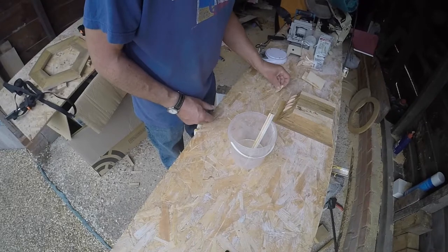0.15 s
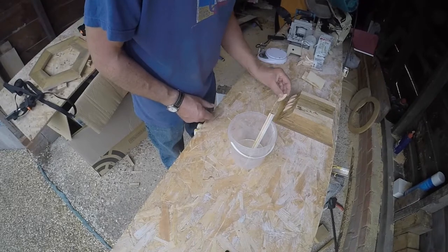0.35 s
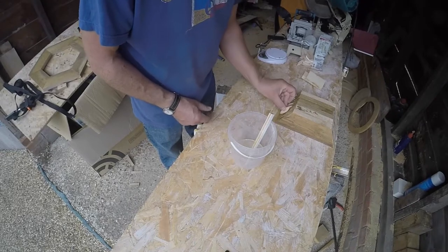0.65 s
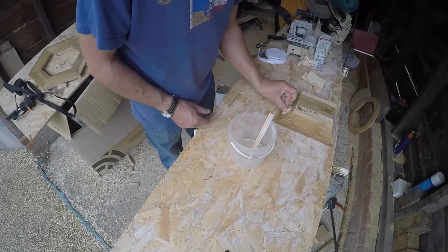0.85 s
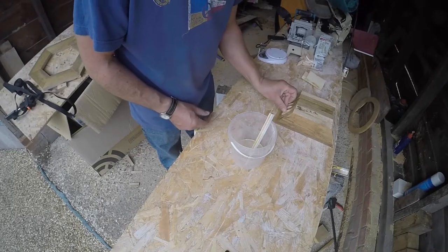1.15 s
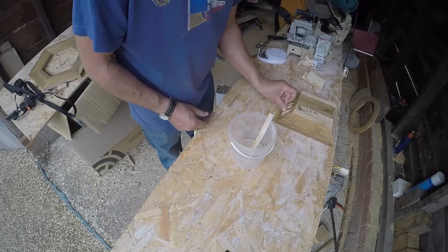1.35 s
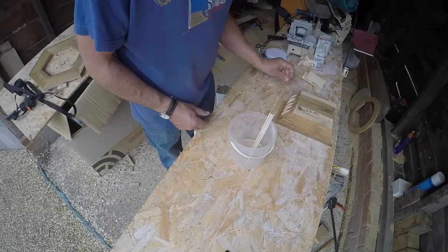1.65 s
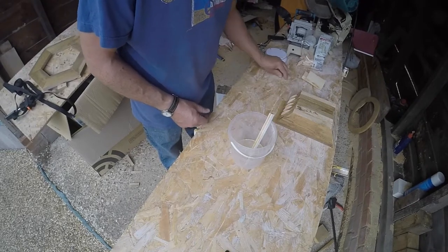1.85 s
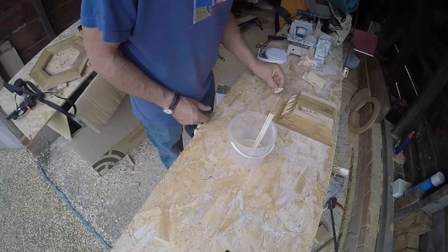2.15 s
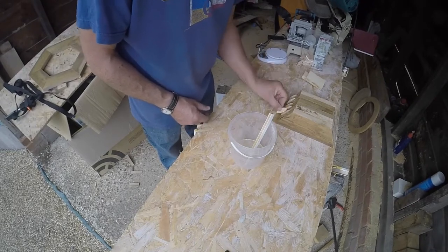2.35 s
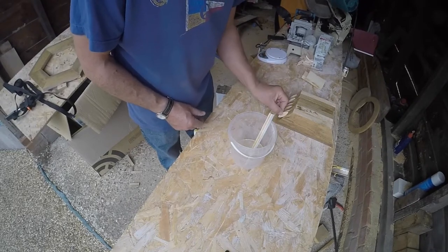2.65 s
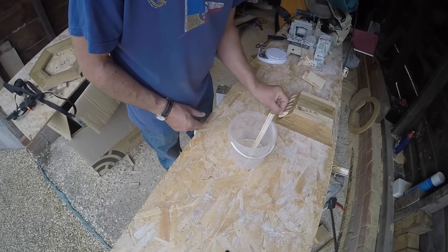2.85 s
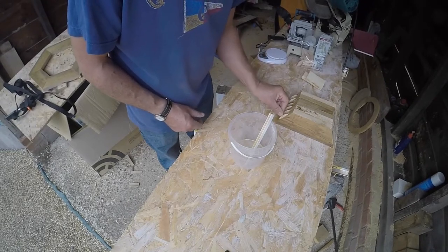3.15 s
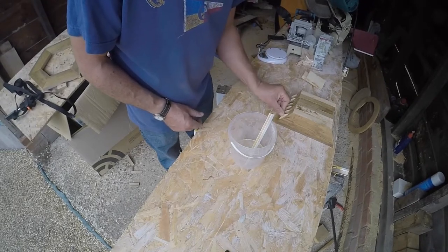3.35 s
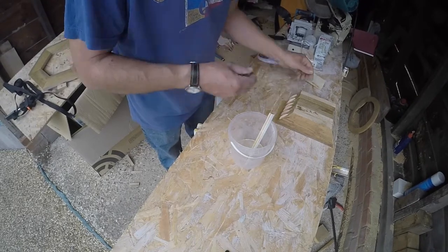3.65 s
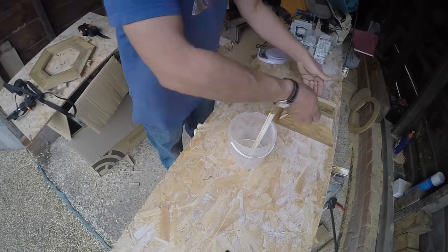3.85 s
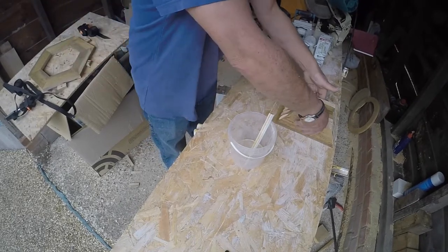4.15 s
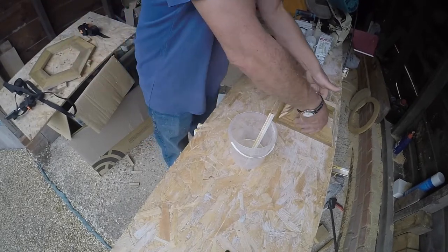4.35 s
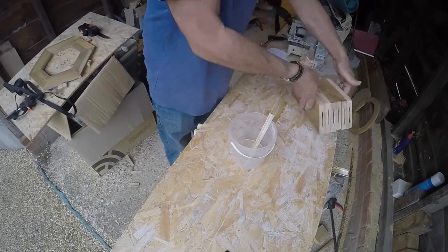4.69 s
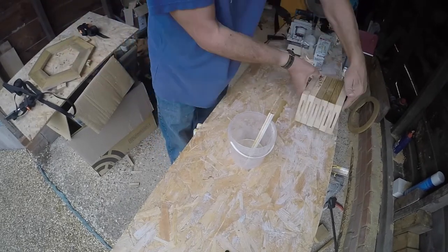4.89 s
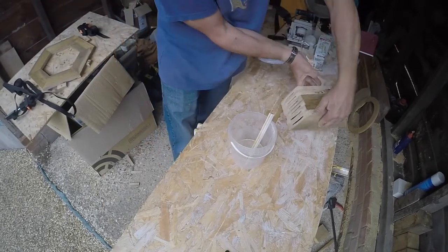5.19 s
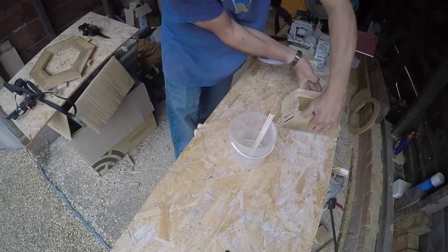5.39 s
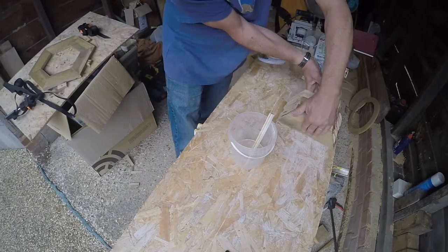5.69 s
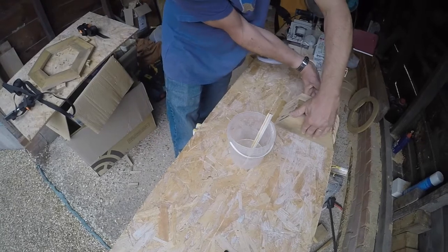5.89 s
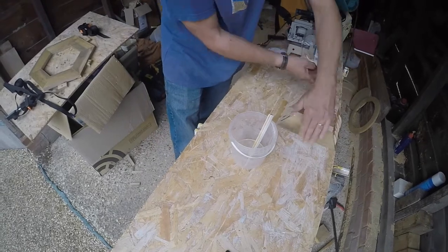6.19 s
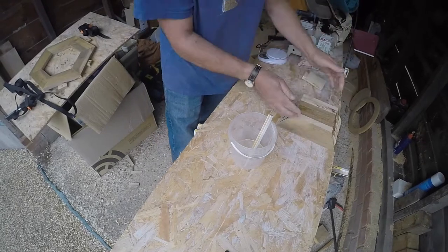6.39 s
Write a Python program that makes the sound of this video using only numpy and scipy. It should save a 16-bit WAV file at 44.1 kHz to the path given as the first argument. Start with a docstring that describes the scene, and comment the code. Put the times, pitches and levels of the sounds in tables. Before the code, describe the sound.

Throughout, a deep rumble swells and lumps unevenly beneath a quiet, steady hiss with thin, barely audible whines. At the very start there is a small wooden knock, with fainter ones around 0.2 s. Near 1.9 s a light block is pushed with a tiny dry scrape and set down with a soft click. A barely audible touch comes at 3.4 s. From 4.2 to 4.4 s a hollow slatted box gives several muted knocks and light rubs as it is picked up. At 5.54 s its edge strikes the bench with a hard clack, then scuffs; at 5.84 s it falls flat, an abrupt bright crack and heavy woody thud that overloads the nearby microphone. Loose slats rattle away until about 6.05 s, with a short dull shed tail. A soft, hollow hand pat follows at 6.18 s, then a faint rubbing slide around 6.4 s before the rumble ends at about 6.5 s.

```python
"""Wood knocks, slides, then drops flat with an overloading crack and rattle, over rumble and hiss.
A slatted wooden box is picked up, turned and set down on a chipboard workbench in a shed, and a hand pats it;
a small block is nudged before that. Blows and slips drive damped modes of the wood; short noise bursts make
clacks and thuds, shaped noise makes the rubs, the lumpy rumble and the hiss, and the shed adds a dull tail."""
import sys
import numpy as np
from scipy import signal
from scipy.fft import rfft, irfft, next_fast_len
from scipy.io import wavfile
from scipy.ndimage import uniform_filter1d

SR = 44100
rng = np.random.default_rng(int(sys.argv[2]) if len(sys.argv) > 2 else 0)


def put_to_file(sound):
    """Save the sound as 16-bit audio at rate SR, in the file named by the first command-line argument."""
    columns = np.atleast_2d(sound).T  # one column per channel
    safe = np.clip(columns, -1, 1)
    whole_steps = np.round(safe * 32767)
    wavfile.write(sys.argv[1], SR, whole_steps.astype(np.int16))


N = 287973


def box(clack_db=2.0, clack_growth=0.35, spread_db=3.5, detune=0.0061, held_ring_db=2.5, flat_ring_db=-3):
    """Knocks ring box and bench, make the bench thud and the slats clack; lying flat damps the slats."""
    # knocks of box on bench: t/s, box level/dB, bench level/dB, contact brightness f/Hz
    knocks = [(0.002, -28, -45, 2600), (0.153, -33, -44, 650), (0.204, -37, -43, 1300),
              (3.423, -39.5, -51, 1400), (4.175, -25.5, -42, 500), (4.1895, -20.5, -27, 596),
              (4.364, -32.5, -35, 1100), (4.404, -25, -32, 450), (5.536, -3, -18, 2590),
              (5.54, -9.5, -26, 3500), (5.544, -26, -4, 3300), (5.579, -13.5, -17, 950),
              (5.8129, -18.5, -17.5, 2200), (5.819, -17, -10.5, 2330), (5.8385, -10, -0.5, 490),
              (5.8422, 7, 5, 1880), (5.8485, -13, -8, 4370), (5.8595, -2.5, -6.5, 600),
              (5.886, -24, -26, 4000), (5.8972, -23, -13.5, 900), (5.9071, -12, -9, 2200),
              (5.9548, -22.5, -21.5, 3000), (5.9835, -24.5, -36, 2830), (6.002, -31, -26, 2020),
              (6.016, -22.5, -20.5, 1670)]
    # box dragged over the bench: middle t/s, length/s, level/dB, brightness f/Hz
    slides = [(0.205, 0.034, -44, 1000), (3.428, 0.04, -47.5, 1100), (4.19, 0.039, -49, 700),
              (4.267, 0.05, -42.5, 2180), (5.638, 0.038, -29.5, 1000), (5.715, 0.068, -33, 330),
              (5.895, 0.036, -39, 2600), (6.005, 0.083, -41.5, 1800), (6.42, .2, -61, 2540)]
    # ringing modes of the box, lowest first: f/Hz, level/dB, decay t60/s
    box_modes = [(506, -3, 0.11), (570, -11.5, 0.14), (648.5, -14, 0.098), (742, -16, 0.12),
                 (832, -14.5, 0.07), (871, -17, 0.09), (969, -23.5, 0.12), (992, -17, 0.074),
                 (1126, -23.5, 0.16), (1250, -24, 0.099), (1420, -20, .07), (1463, -18, 0.049),
                 (1540, -15, 0.035), (1640, -24, 0.11), (1746, -20, 0.03), (2052, -17.5, 0.055),
                 (2145, -20, 0.045), (2330, -16.5, 0.045), (2465, -20.5, 0.03), (2665, -14.5, 0.032),
                 (2780, -17.5, 0.03), (2960, -20.5, 0.058), (3120, -13, 0.031), (3550, -35, 0.037),
                 (4350, -24, 0.037), (4900, -25, 0.025), (5850, -28.5, 0.027)]
    # ringing modes of the bench top: f/Hz, level/dB, decay t60/s
    bench_modes = [(69.4, -13, 0.98), (94, -17, 0.33), (136.7, -7.5, 0.33), (153.4, -18, 0.65),
                   (245, -20, 0.056), (285.8, -17, 0.15), (376, -21, 0.071), (449.5, -5, 0.26),
                   (604, -6, 0.065), (667, -13.5, 0.21), (748, -21, 0.085)]
    # lying flat, the box couples to the bench and its lowest mode splits in three: f/Hz, level/dB, decay t60/s
    flat_modes = [(445, -16, 0.2), (523, -1, 0.12), (588.5, -5.5, 0.26)]
    lies_flat_s = 5.83

    on_slats, on_bench, held, flat = np.zeros((4, N))
    blows = []
    for s, box_db, bench_db, hz in knocks:
        force = contact(hz)
        add(held if s < lies_flat_s else flat, s, from_db(box_db) * force)
        add(on_bench, s, from_db(bench_db) * force)
        blows.append((s, box_db, hz))
    blows += chatter()

    slat_blows = []
    for s, db, hz in blows:
        # the clack grows faster than the blow, up to 0 dB
        growth_db = clack_growth * min(db, 0)
        add(on_slats, s, from_db(db + clack_db + growth_db) * clack(contact(hz)))
        ring_db = held_ring_db if s < lies_flat_s else flat_ring_db
        slat_blows.append((s, db + ring_db, hz))
    slats = struck(slat_blows, box_modes[1:], spread_db, detune)

    panel = ring(held, box_modes[:1])
    for mode in flat_modes:
        panel = panel + rocking(ring(flat, [mode]))
    # broad boards are slow to get moving
    boards = lowpass(panel + ring(on_bench, bench_modes), hz=1500)
    return boards + slats + on_slats + bench_thud(on_bench) + slap() + drags(slides, box_modes)


def chatter(count=16):
    """While the box settles, its loose slats tick at uneven moments, on the whole ever more weakly."""
    start_s, length_s, brightness_hz = 5.866, 0.17, 2240
    start_db, loss_db_per_s, spread_db = -30, 71.5, 9
    late = rng.random(count)
    size = rng.uniform(-1, 1, count)
    after = (np.arange(count) + late) / count * length_s
    levels = start_db - loss_db_per_s * after + spread_db * size
    return [(start_s + t, db, brightness_hz) for t, db in zip(after, levels)]


def struck(rows, modes, spread_db, detune):
    """Each blow meets another spot and grip, so it weights and tunes the modes its own way."""
    out = np.zeros(N)
    for s, db, hz in rows:
        weights, shifts = rng.standard_normal((2, len(modes)))
        own = []
        for (f, level, t60), weight, shift in zip(modes, weights, shifts):
            own.append((f * (1 + detune * shift), level + spread_db * weight, t60))
        force = from_db(db) * np.pad(contact(hz), (0, SR // 4))
        # neighbouring modes swing opposite ways
        add(out, s, ring(force, own[1::2]) - ring(force, own[::2]))
    return out


def rocking(x, sway_s=0.00025, rate_hz=44.85):
    """The box rocks as it settles: its ring runs early or late, so the pitch wavers."""
    at = np.arange(N)
    return np.interp(at + sway_s * SR * drift(rate_hz), at, x)


def bench_thud(force):
    """The bench top's heavily damped low modes answer a blow with a short thud."""
    return from_db(14) * clack(force, decay_s=0.003, low_hz=166, high_hz=396)


def slap():
    """One short, bright crack as the flat face meets the bench."""
    out = np.zeros(N)
    crack = clack(np.ones(1), decay_s=0.0012, low_hz=2600, high_hz=5400)
    add(out, 5.8432, from_db(-2) * crack)
    return out


def hand_pats():
    """A hand pats the box and presses on it, so it rings with modes of its own."""
    # pats: t/s, level/dB, contact brightness f/Hz
    pats = [(6.181, -18.5, 590), (6.1875, -10, 338)]
    # modes of the box pressed under the hand: f/Hz, level/dB, decay t60/s
    pressed_modes = [(339, -15, 0.098), (499, 2.5, 0.11), (555, -13, .05), (646, -8.5, 0.082),
                     (950, -19, 0.053)]
    return taps(pats, pressed_modes)


def small_block():
    """A light block is pushed a little way and tipped down, ringing its own modes."""
    # block set down: t/s, level/dB, contact brightness f/Hz
    touches = [(1.950, -43, 5000), (1.979, -40, 5000), (1.984, -29, 1100)]
    # block pushed along: middle t/s, length/s, level/dB, brightness f/Hz
    pushes = [(1.907, 0.04, -40, 2900), (1.929, .03, -39, 2400)]
    # ringing modes of the block: f/Hz, level/dB, decay t60/s
    block_modes = [(504, 1.5, 0.074), (640, 3, 0.063), (685, -12, 0.06), (930, -8, 0.04), (1143, -13, 0.07),
                   (1410, -12, .035), (1530, -12, 0.03), (2010, -12, .03), (2106, -3, 0.035),
                   (2640, -8, .03), (3070, -7, 0.057)]
    return taps(touches, block_modes) + drags(pushes, block_modes, slips_per_s=890, spread_db=0)


def rubs(grain_db=3, grain_hz=220):
    """Light friction hisses in one resonance, unevenly."""
    # dry rubbing of fingers and wood grain: middle t/s, length/s, level/dB, centre f/Hz, width/Hz
    strokes = [(0.67, 0.034, -62, 4900, 4000), (1.925, 0.06, -58, 3200, 3000),
               (1.951, 0.008, -55, 6000, 900), (4.094, 0.08, -60, 3800, 3900),
               (6.34, 0.043, -59, 5700, 7900), (4.172, 0.019, -50, 2680, 200),
               (4.266, 0.032, -54, 2650, 220), (4.193, 0.024, -47, 1410, 150),
               (4.268, 0.036, -52, 1400, 150), (5.724, .06, -45, 3900, 520), (5.72, 0.09, -52, 4900, 2400),
               (6.415, 0.18, -54, 1630, 110), (6.42, 0.16, -58, 2720, 180)]
    out = np.zeros(N)
    for s, length, db, hz, width in strokes:
        push = stroke(length)
        friction, grain = rng.standard_normal((2, len(push)))
        uneven = friction * from_db(grain_db * rms_one(lowpass(grain, grain_hz)))
        add(out, s - length / 2, from_db(db) * rms_one(narrow(uneven, hz, width) * push))
    return out


def shed(x):
    """A few near reflections, then a dull, diffuse tail from the cluttered wooden walls."""
    # first reflections from bench top and near walls: delay t/s, level/dB
    echoes = [(.00591, -12), (.00981, -20.5), (.01571, -24), (0.0234, -32)]
    t60_s, tail_db, wall_hz, thinned_below_hz = 0.32, -22, 3420, 370
    t = np.arange(SR // 2) / SR
    decay = np.exp(-np.log(1000) * t / t60_s)
    tail = lowpass(rng.standard_normal(len(t)), wall_hz) * decay * (t > echoes[0][0])
    tail = tail / np.sqrt(np.sum(tail ** 2) * SR / (2 * wall_hz))
    # the diffuse tail is thinned below this frequency
    response = from_db(tail_db) * highpass(tail, thinned_below_hz)
    for delay, db in echoes:
        response += from_db(db) * lowpass(signal.unit_impulse(len(t), round(delay * SR)), wall_hz)
    return signal.fftconvolve(x, response)[:N]


def rumble(deep_db=0, body_db=0.34, mid_db=-2.0, upper_db=-1.0, deep_lumps_db=1.7, lumps_hz=16):
    """Noise in four low registers swells separately; the deepest has quick random lumps on top."""
    # swells of the four registers, before the trims above: t/s, level/dB
    deep_swell = [(0.0, -20.5), (0.28, -24), (0.5, -21), (0.8, -33), (1.08, -21), (1.3, -29.5), (1.6, -24),
                  (1.74, -35), (2.33, -20), (2.65, -25), (2.8, -19), (3.42, -29), (3.6, -22.5),
                  (4.05, -27.5), (4.3, -22), (5.25, -26.5), (5.98, -21), (6.53, -22)]
    body_swell = [(0.0, -31.5), (0.35, -27.5), (0.62, -33), (1.05, -28), (1.28, -31), (1.85, -29),
                  (2.35, -31.5), (2.6, -37.5), (2.76, -28), (3.9, -32), (4.5, -29.5), (5.4, -32),
                  (6.5, -30)]
    mid_swell = [(0.0, -33), (0.3, -33), (0.72, -38), (1.1, -35.5), (1.54, -38.5), (2.02, -32.5),
                 (2.6, -41.5), (2.98, -32.0), (3.4, -33), (3.6, -40.0), (3.78, -37), (4.06, -42),
                 (4.22, -34), (4.46, -31.5), (4.84, -34.5), (5.48, -35.5), (6.28, -35.5), (6.52, -31.5)]
    upper_swell = [(0.0, -38.5), (0.4, -39.0), (0.86, -47), (1.24, -38), (1.42, -44), (2.02, -40),
                   (2.36, -44), (2.48, -41.0), (2.78, -45), (3.08, -36.5), (3.22, -43.5), (3.56, -47.5),
                   (4.16, -40.5), (4.56, -42.0), (4.7, -46), (5.16, -40.0), (5.48, -46.0), (6.52, -40.5)]
    # colours of the four registers, as relative density: f/Hz, level/dB per Hz
    deep_colour = [(12, -33), (22, -4), (32, -0.5), (62, -5.5), (78, -15.5), (105, -37)]
    body_colour = [(55, -48), (78, -3), (100, 0.5), (125, -5), (150, -14), (175, -10), (200, -23),
                   (260, -32.5)]
    mid_colour = [(140, -11.5), (160, 2.5), (176, 8.5), (202, -7.5), (232, 1.5), (255, 1), (285, -1.5),
                  (320, -16), (360, -35)]
    upper_colour = [(270, -24.5), (325, -6.5), (375, 3), (400, -0.5), (420, -4), (470, -5), (515, -10),
                    (560, -14.5), (660, -17.5), (900, -56)]

    lumps = deep_lumps_db * drift(lumps_hz)
    deep = from_db(in_time(deep_swell) + deep_db + lumps) * evened(noise(deep_colour), span_s=0.1)
    body = from_db(in_time(body_swell) + body_db) * evened(noise(body_colour), span_s=0.15)
    mid = from_db(in_time(mid_swell) + mid_db) * evened(noise(mid_colour), span_s=0.14)
    upper = from_db(in_time(upper_swell) + upper_db) * evened(noise(upper_colour), span_s=0.11)
    return deep + body + mid + upper


def hiss(hiss_db=-48.5, whine_width_hz=14):
    """Steady coloured noise with a few thin, wavering whines: white noise in narrow resonances."""
    # colour of the hiss, as relative density: f/Hz, level/dB per Hz
    hiss_colour = [(200, 10), (600, -3.5), (1000, -1), (1400, -4), (1850, -2), (2250, -3), (2750, -0.5),
                   (3200, -7), (4100, -5.5), (6200, -13), (7200, -18), (8500, -18.5), (11000, -22.5),
                   (15000, -26)]
    # faint whines in the hiss: f/Hz, level/dB
    whine_tones = [(515, -54), (775, -72.5), (1373, -70.5), (1814, -69), (8479, -84.5)]
    white = rng.standard_normal(N)
    out = from_db(hiss_db) * noise(hiss_colour)
    for hz, db in whine_tones:
        out += from_db(db) * rms_one(narrow(white, hz, whine_width_hz))
    return out


def contact(hz, crunch_db=-27, crunch_s=0.0015, crunch_hz=1400):
    """Force of one blow: a click and a fine crunch of fibres, both duller when the touch is soft."""
    t = np.arange(SR // 20) / SR
    crunch = rng.standard_normal(len(t)) * np.exp(-t / crunch_s)
    force = from_db(crunch_db) * highpass(crunch, crunch_hz)
    force[0] += 1
    return lowpass(force, hz)


def ring(force, modes):
    """A force sets damped sines ringing, all starting together."""
    out = 0
    for hz, db, t60 in modes:
        r = np.exp(-np.log(1000) / (t60 * SR))
        w = 2 * np.pi * hz / SR
        mode = signal.lfilter([0, np.sin(w)], [1, -2 * r * np.cos(w), r * r], force + 1e-18)
        out = out + from_db(db) * mode
    return out


def clack(force, decay_s=0.0044, low_hz=250, high_hz=3300):
    """Many heavily damped modes of the wood blur into one short burst."""
    t = np.arange(SR // 20) / SR
    band = signal.butter(2, [low_hz, min(high_hz, SR / 3)], "band", fs=SR, output="sos")
    burst = signal.sosfilt(np.vstack([band, band]), rng.standard_normal(len(t)) * np.exp(-t / decay_s))
    return signal.fftconvolve(force, burst / np.sqrt(np.sum(burst ** 2)))[:N]


def taps(rows, modes):
    """Light blows on one set of modes."""
    force = np.zeros(N)
    for s, db, hz in rows:
        add(force, s, from_db(db) * contact(hz))
    return ring(force, modes)


def drags(rows, modes, slips_per_s=2500, spread_db=3.0, low_hz=700):
    """Tiny slips on the grain, filtered by each row's brightness, ring the modes; dull drags judder near 500 Hz."""
    out = np.zeros(N)
    for s, length, db, hz in rows:
        push = stroke(length)
        count = len(push)
        happens = rng.random(count) < slips_per_s / SR
        sizes = rng.standard_normal(count) * from_db(spread_db * rng.standard_normal(count))
        slips = np.pad(happens * sizes * push, (0, SR // 5))   # room for the ring to die away
        sound = ring(highpass(lowpass(slips, hz), low_hz), modes)
        add(out, s - length / 2, from_db(db) * sound / np.sqrt(np.sum(sound ** 2) / count + 1e-20))
    return out


def stroke(length):
    """Smooth rise and fall of a short hand movement."""
    return np.sin(np.linspace(0, np.pi, max(int(length * SR), 8)))


def noise(spectrum):
    """Steady noise of the given colour, rms 1."""
    hz, level = np.transpose(spectrum)
    size = next_fast_len(N)
    bins = np.maximum(np.arange(size // 2 + 1) * SR / size, 1)
    gain = from_db(np.interp(np.log(bins), np.log(hz), level))
    gain = gain * (bins > hz[0] / 2) * (bins < hz[-1] * 2)
    return rms_one(irfft(rfft(rng.standard_normal(size)) * gain, size)[:N])


def evened(x, span_s):
    """Take the slow swells out of a noise."""
    return x / np.sqrt(uniform_filter1d(x ** 2, max(int(span_s * SR), 2)) + 1e-6)


def drift(rate_hz):
    """Random wandering between new values at the given rate, rms 1."""
    steps = rng.standard_normal(400)
    at = np.arange(N) / SR * rate_hz
    return rms_one(np.interp(at, np.arange(len(steps)), steps))


def narrow(x, hz, width):
    """A resonance applied twice, for steep skirts."""
    r = np.exp(-np.pi * width / SR)
    section = [1 - r, 0, r - 1, 1, -2 * r * np.cos(2 * np.pi * hz / SR), r * r]
    return signal.sosfilt([section, section], x)


def lowpass(x, hz):
    """Two-pole low-pass."""
    return signal.sosfilt(signal.butter(2, min(hz, SR / 2 - 1000), fs=SR, output="sos"), x + 1e-18)


def highpass(x, hz):
    """Two-pole high-pass."""
    return signal.sosfilt(signal.butter(2, hz, "high", fs=SR, output="sos"), x)


def from_db(db):
    """Decibels to gain."""
    return 10 ** (np.asarray(db) / 20)


def rms_one(x):
    """Scale to rms 1."""
    return x / np.sqrt(np.mean(x ** 2) + 1e-20)


def in_time(rows):
    """A level curve, joined by straight lines, at every sample."""
    s, level = np.transpose(rows)
    return np.interp(np.arange(N) / SR, s, level)


def add(track, s, sound):
    """Mix a sound into a track from time s on."""
    start = int(np.clip(round(s * SR), 0, N - 1))
    track[start:start + len(sound)] += sound[:N - start]


def scene():
    """Wood in the shed, over rumble and hiss."""
    # the wood sounds lose what lies below about 30 Hz
    wood = highpass(box() + hand_pats() + small_block() + rubs(), hz=30.5)
    return (wood + shed(wood) + rumble() + hiss())[None]


def record(dry, threshold_db=-1, share=0.2, release_db_per_s=13, attack_s=0.0055, cutoff_hz=15400):
    """Gain control ducks after loud peaks, too late to stop them clipping; the top is cut."""
    t = np.arange(N) / SR
    level_db = 20 * np.log10(np.abs(dry[0]) + 1e-9)
    over = np.maximum(level_db - threshold_db, 0) * share
    # hold each peak and let it fall at a steady rate
    held = np.maximum.accumulate(over + release_db_per_s * t) - release_db_per_s * t
    r = np.exp(-1 / (attack_s * SR))
    duck_db = signal.lfilter([1 - r], [1, -r], held)
    clipped = np.clip(dry * from_db(-duck_db), -1, 1)
    return signal.sosfilt(signal.ellip(10, 0.1, 90, cutoff_hz, fs=SR, output="sos"), clipped)


dry = scene()
out = record(dry)
put_to_file(out)
```